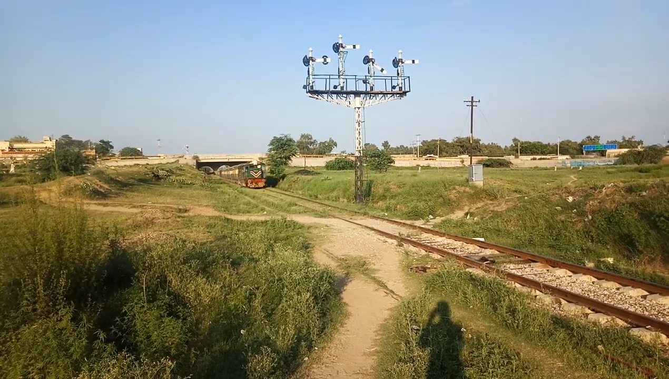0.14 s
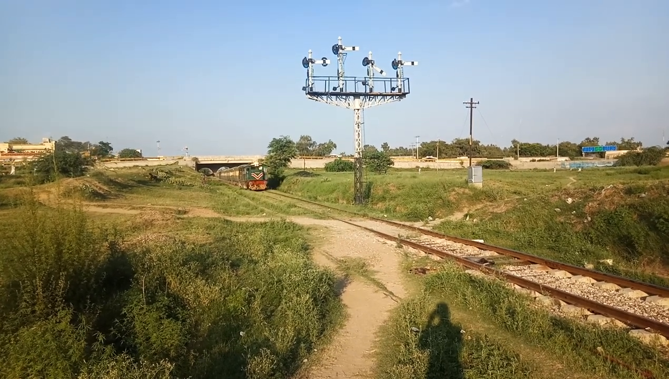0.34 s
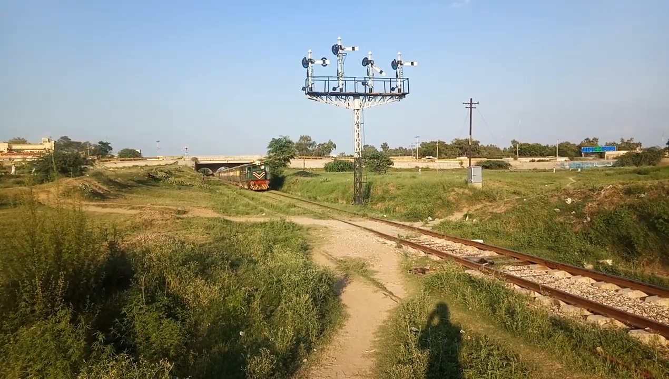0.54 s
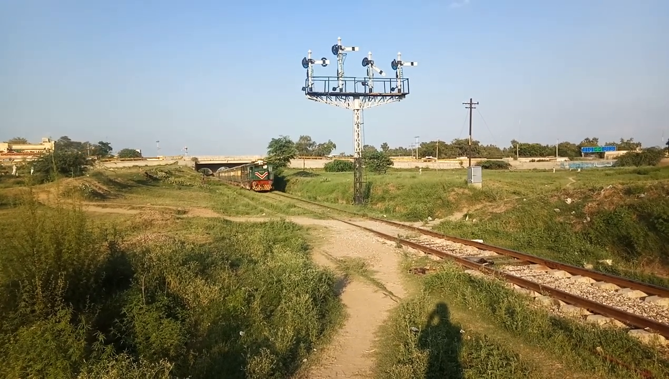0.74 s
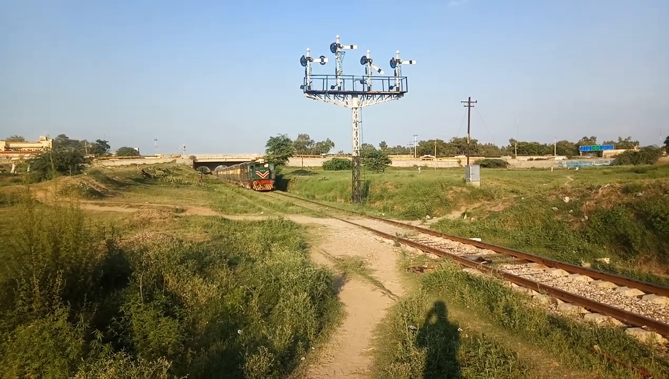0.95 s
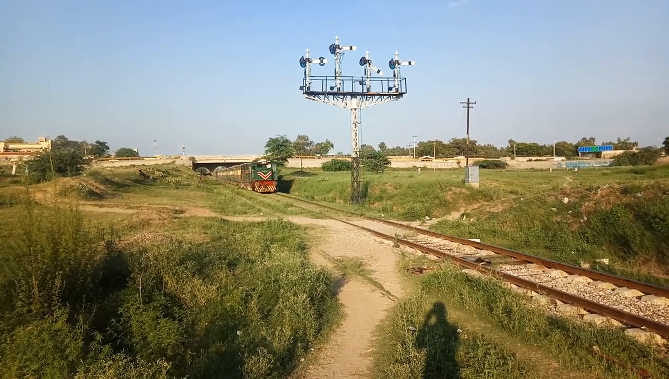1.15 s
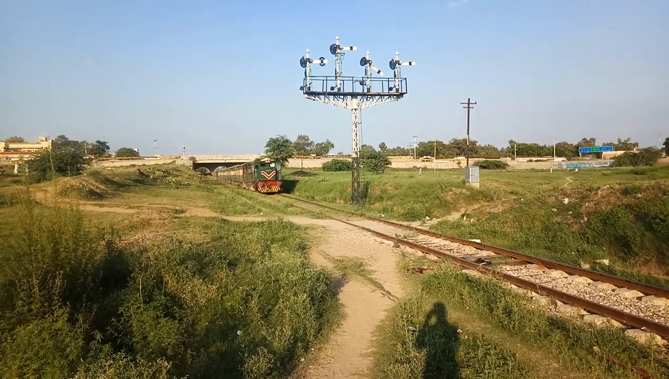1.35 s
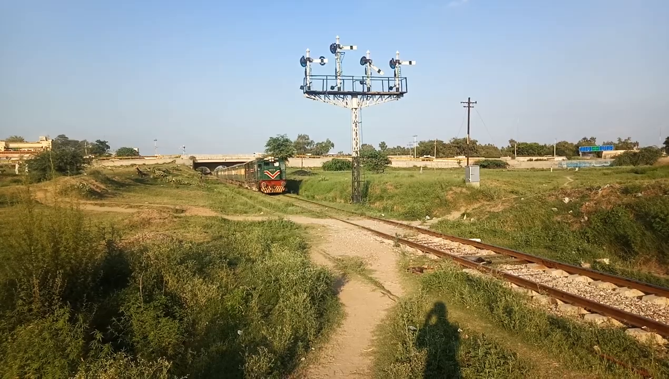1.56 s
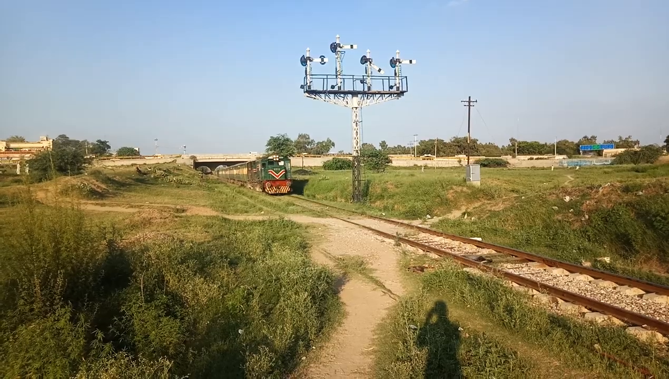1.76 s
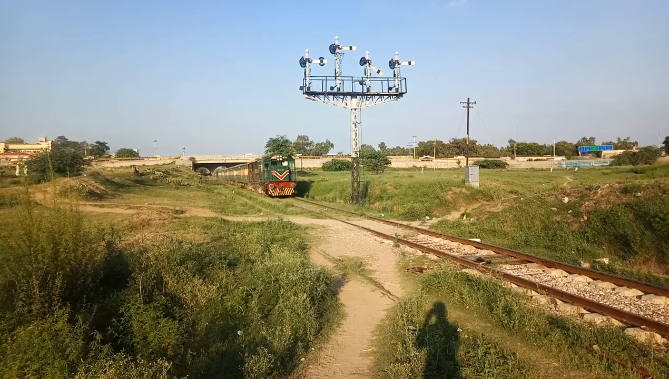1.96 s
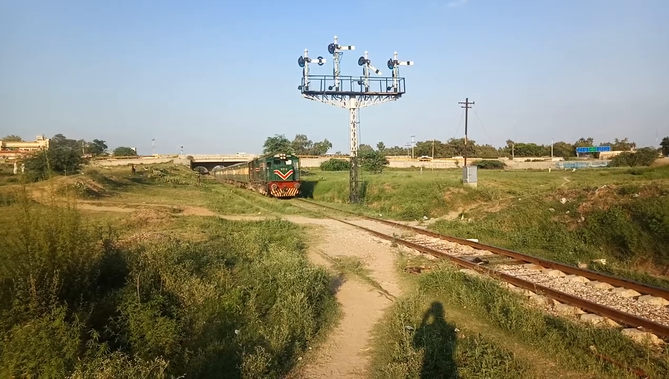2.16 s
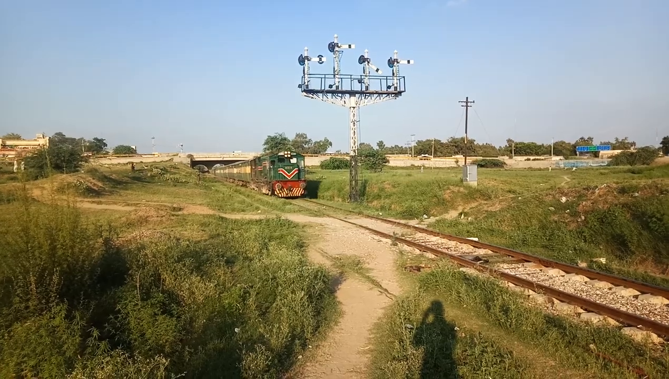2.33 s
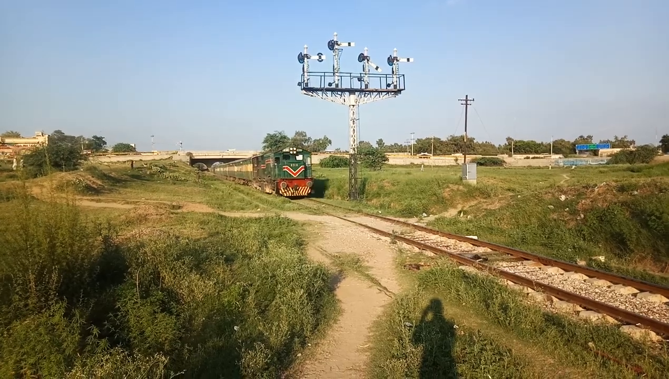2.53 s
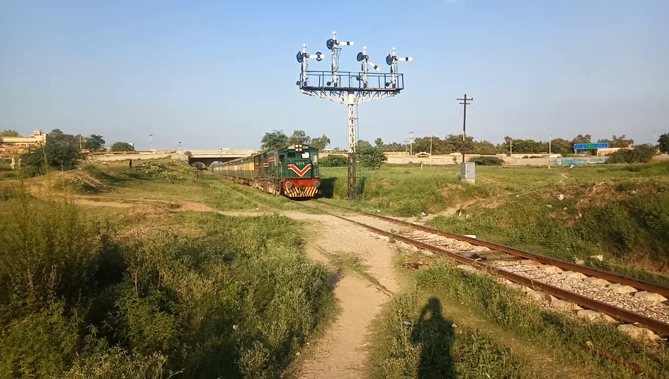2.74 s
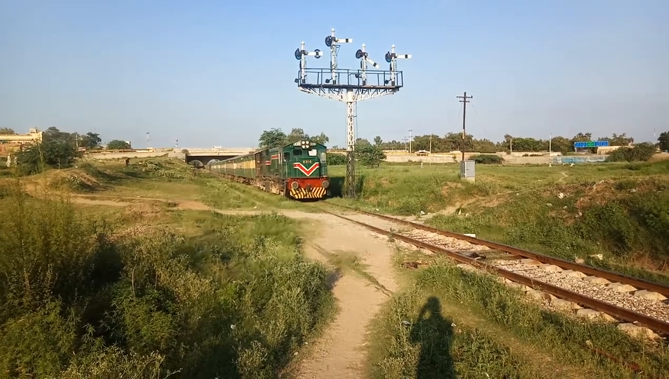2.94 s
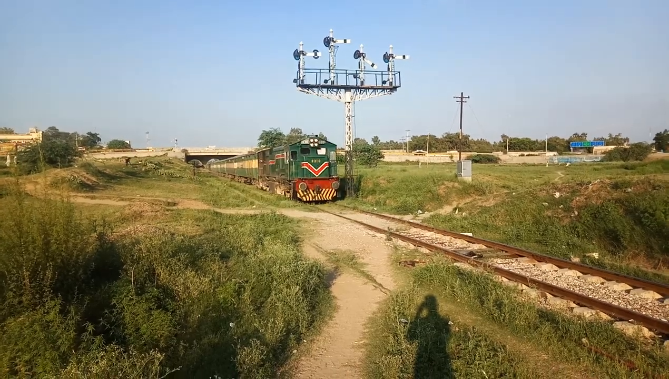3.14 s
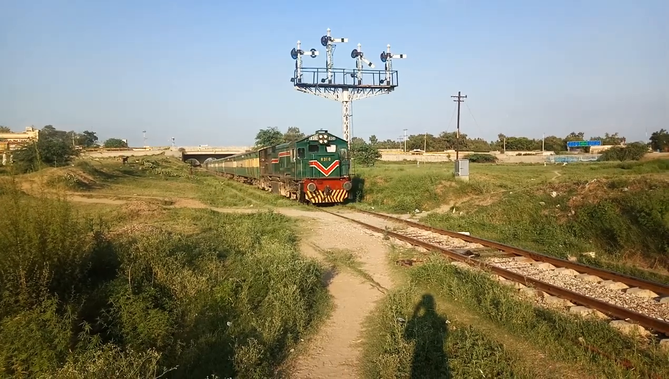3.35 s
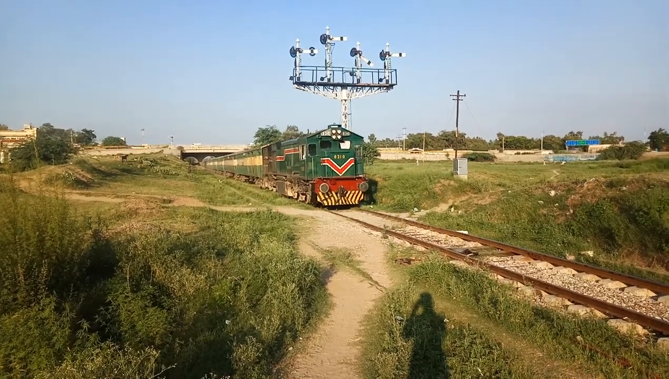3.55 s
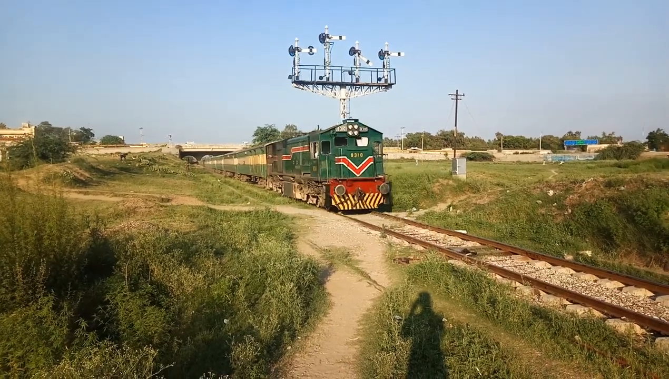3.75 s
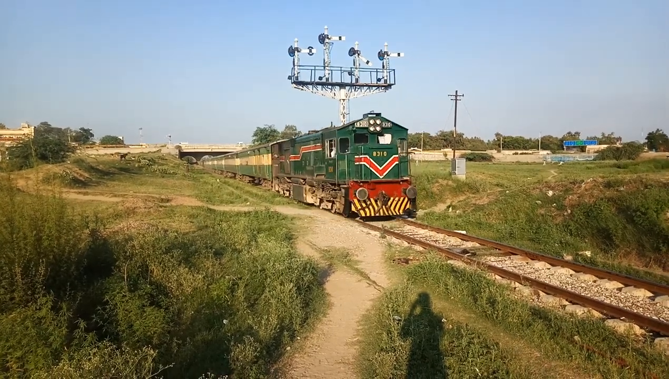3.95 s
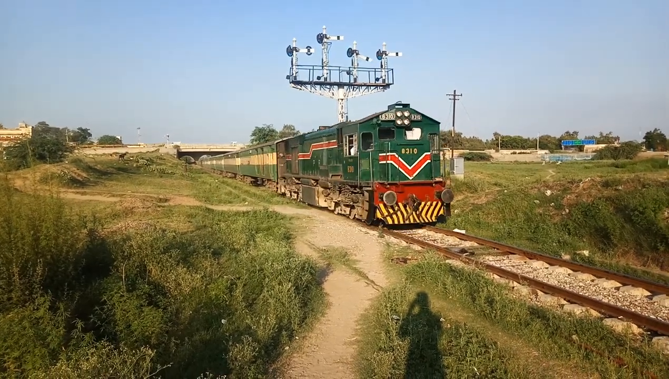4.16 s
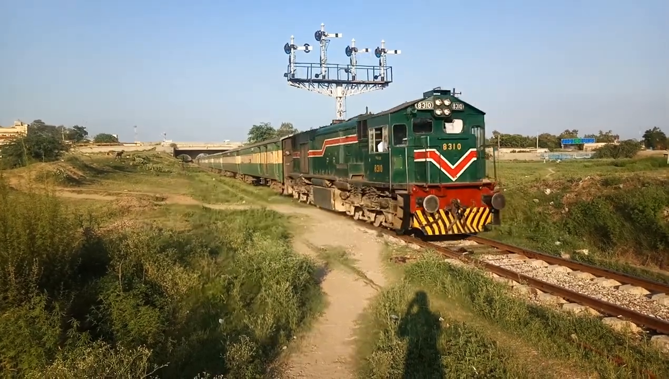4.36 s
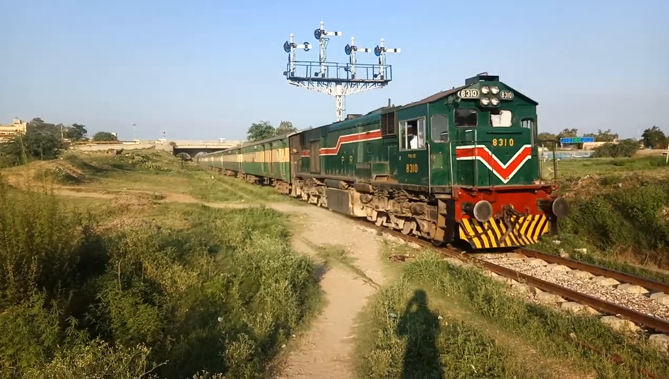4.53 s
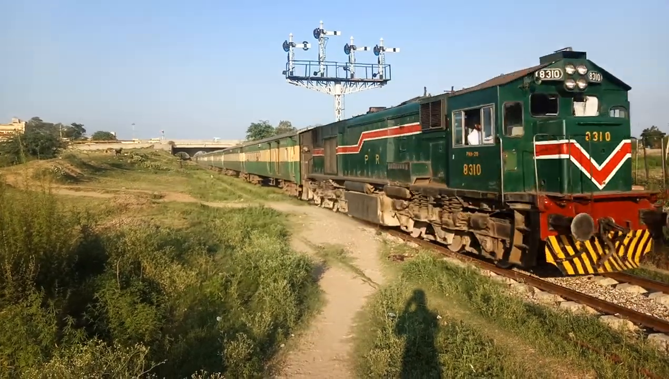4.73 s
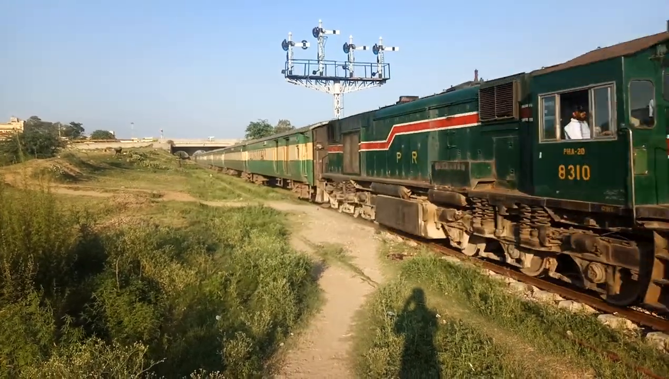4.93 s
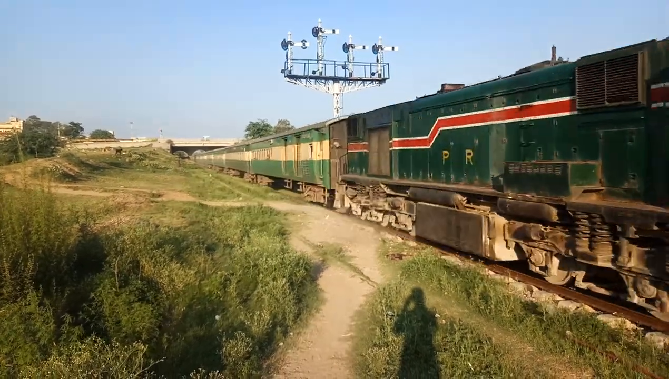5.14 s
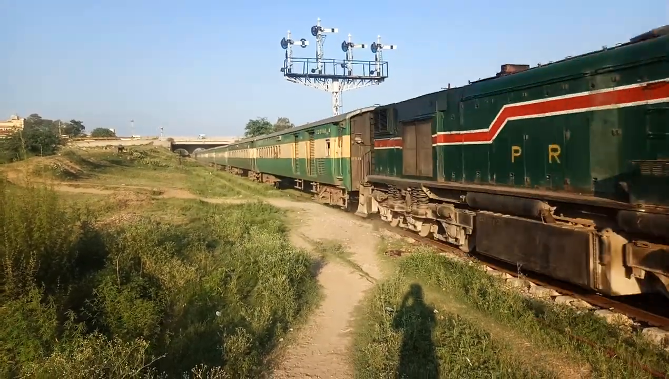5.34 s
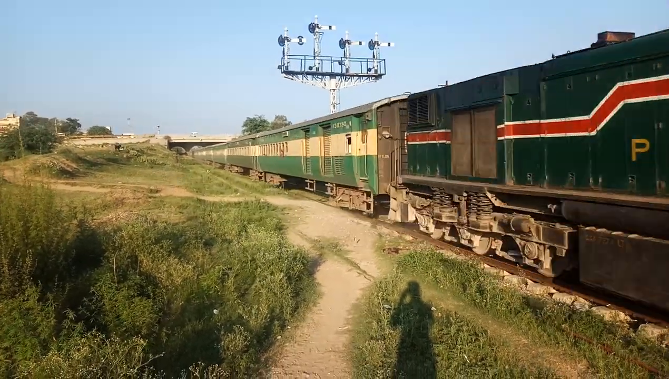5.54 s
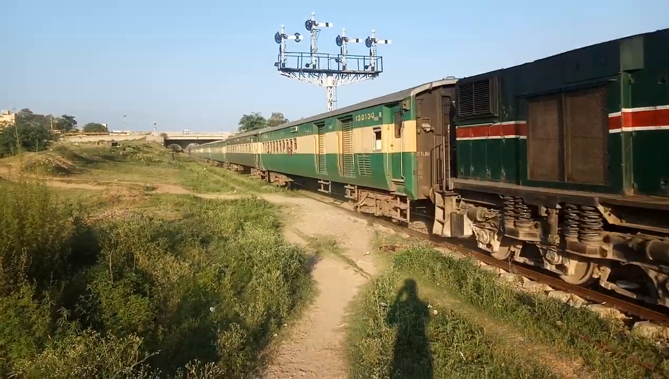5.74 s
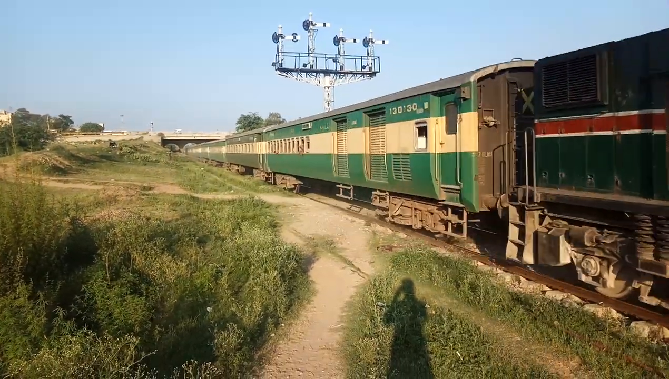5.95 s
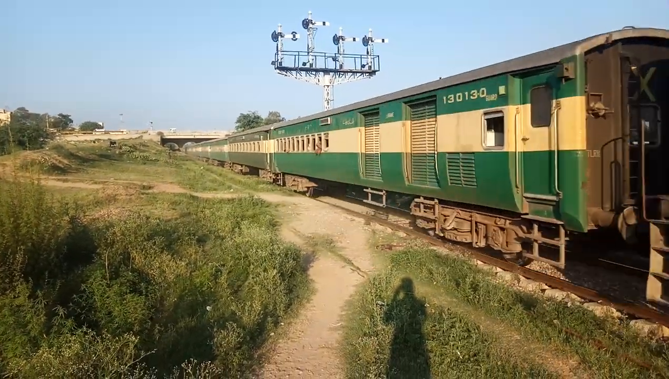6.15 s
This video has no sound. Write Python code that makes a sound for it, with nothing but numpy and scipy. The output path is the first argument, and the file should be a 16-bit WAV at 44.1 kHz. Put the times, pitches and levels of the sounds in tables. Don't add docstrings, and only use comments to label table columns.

```python
import sys
import numpy as np
from scipy import signal
from scipy.fft import rfft, irfft, next_fast_len
from scipy.io import wavfile
from scipy.ndimage import uniform_filter1d, minimum_filter1d, map_coordinates

SR = 44100
rng = np.random.default_rng(int(sys.argv[2]) if len(sys.argv) > 2 else 0)


def gain_from_decibels(decibels):
    exponent = np.asarray(decibels, float) / 20
    return 10 ** exponent


def materialize(psi):
    bounded = np.clip(np.atleast_2d(psi).T, -1, 1)
    quanta = np.round(bounded * 32767).astype(np.int16)
    wavfile.write(sys.argv[1], SR, quanta)


N = 272979

# time in seconds, loudness in dB, firing rate in Hz.
ENGINE = [(0, -41, 105.4), (.4, -36, 103), (.8, -35.5, 104.5), (1.2, -33, 101), (1.8, -29.5, 100),
          (2.5, -28.5, 100.9), (2.85, -23.5, 103.8), (3.1, -25.5, 100.4), (3.7, -22.5, 102),
          (3.9, -18, 99.2), (4.35, -18, 99.86), (4.5, -17, 104.8), (5.2, -18.5, 104.5),
          (5.33, -17.5, 99.43), (5.52, -16.5, 99.6), (5.8, -17, 102.9), (6.05, -16.5, 99),
          (6.19, -19.5, 101.4)]
# centre in seconds, change in dB, length in seconds.
SURGES = [(0.154, -3, .05), (1.592, 0, 0.096), (1.76, -6, 0.047), (2.118, 5, 0.033), (2.63, -0.5, 0.051),
          (2.767, -5.5, 0.042), (3.15, 2, 0.14), (3.568, 1.5, 0.031), (3.928, 4, .035), (4.018, 0.5, 0.019),
          (4.19, 7.5, 0.02), (4.32, 3.5, 0.033), (4.808, -7, 0.021), (5.299, -4, 0.055), (5.5, 5, 0.023),
          (5.73, 2.5, .04), (5.832, -7.5, 0.037), (5.908, 0, 0.023), (5.99, -1, 0.026), (6.158, 5, 0.017)]
# time in seconds, level in dB.
SECOND_ORDER_HEARD = [(0, -16.5), (3.7, -20), (4.3, 2), (5.4, 8), (5.6, -8), (6.19, -13)]
# time in seconds, loudness in dB, load on the nearest track in dB, flank in view 0-1.
RUNNING_GEAR = [(0, -50, -9, 0), (.3, -45, -9.5, 0.17), (.8, -43, -9.5, .2), (1.2, -43.5, -7.5, 0.25),
                (2, -38, -6.5, 0.37), (2.9, -33.5, -6, 0.43), (3.45, -31, 1, .5), (3.7, -27, 0.5, 0.6),
                (3.78, -25.5, 3.5, 0.63), (4.14, -20, -2, .67), (4.45, -20, -2.5, 0.88),
                (4.8, -22, -2.5, .86), (4.92, -18.5, -4, 0.99), (5.45, -20.5, -1, 0.96),
                (5.7, -22, 0.5, 0.91), (5.95, -22, -2, 0.87), (6.05, -15.5, 3, 1), (6.19, -23.5, 1, .95)]
# time in seconds, share of the flank in the wheel sound 0-1.
FLANK_BESIDE = [(0, 0), (5.2, 0.28), (5.35, 0.93), (6.19, 1)]
# time in seconds, strength 0-1.
GROUND_BOUNCE = [(0, 0.2), (3.5, 0.16), (4.2, 0.22), (5.15, 0.25), (5.35, 0), (6.19, 0)]
# time in seconds, peak in dB, thud in dB, snap in dB.
AXLE_BLOWS = [(0.248, -28, -4, -46), (0.39, -31.5, -1, -48), (1.102, -26.5, -0.5, -56),
              (1.973, -17, -8, -49), (2.798, -25.5, 2, -45), (2.8499, -18, -8, -49),
              (3.0844, -18, -13, -43), (3.7165, -24, 0, -53), (3.7502, -14.5, 5, -46.5),
              (3.884, -12, 2.5, -52), (4.165, -16.5, -10, -51.5), (4.291, -3, -2.5, -43),
              (4.430, -5, 3, -42), (4.5025, -4.5, -17, -52.5), (4.582, -2.5, -3, -45),
              (4.711, -2.5, -2, -43.5), (4.850, -3, -6.5, -42), (4.892, -8, -31, -44), (5, -3.5, -2, -42),
              (5.138, -6.5, -9, -43.5), (5.2637, -6.5, -3, -45.5), (5.322, -7.5, 6, -37.5),
              (5.4026, -5, 0, -46), (5.465, -4.5, -1.5, -40.5), (5.563, -9, 6.5, -41), (5.621, -5, 2, -41),
              (5.7028, -6, 0, -47), (6.030, -5.5, 4.5, -38.5), (6.067, -16, -14, -39),
              (6.133, -14.5, -15, -42.5)]
# start in seconds, end in seconds, change in dB.
UNLOADINGS = [
    (4.574, 4.582, -3.5),
    (4.823, 4.84, -3.5),
    (5.308, 5.32, -1.5),
    (5.457, 5.461, -2),
    (5.603, 5.613, 0.5),
    (6.014, 6.03, -6),
]
# time in seconds, peak in dB, pitch in Hz, t60 in seconds.
INSECT_TICKS = [
    (.6412, -46, 6900, .006),
    (1.279, -46, 7100, .006),
]
# time in seconds, peak in dB, pitch in Hz, t60 in seconds.
FLANGE_SQUEAKS = [
    (.03, -52, 2100, 0.15),
    (4.5, -57, 9000, .1),
    (5.185, -44, 9060, .05),
    (5.77, -61, 13200, 0.048),
    (5.955, -60, 9400, 0.16),
]

# frequency in Hz, level in dB per Hz.
DEEP_SPECTRUM = [(12, -44), (25, -38), (40, -11), (55, 0), (70, 11.5), (100, 7.5), (130, 9.5), (200, -65)]
BODY_SPECTRUM = [(50, -54), (85, -11.5), (125, -0.5), (170, 0), (210, -3.5), (260, -7.5), (350, -66)]
DRONE_SPECTRUM = [(120, -57.5), (180, -4), (215, -0.5), (265, 3.5), (315, 3), (400, -2.5), (450, -14),
                  (550, -62)]
# frequency in Hz, level in dB per Hz.
SLEEPER_SPECTRUM = [(250, -16.5), (380, -1), (520, 0), (650, 3), (900, -1), (1100, -11.5), (1500, -65)]
RAIL_SPECTRUM = [(650, -25), (950, -4.5), (1180, 1.5), (1450, -6), (1620, -6), (1900, -10.5), (2100, -6.5),
                 (2400, -24.5), (3000, -56)]
WHEEL_SPECTRUM = [(1180, -36), (2000, -0.5), (2170, -22.5), (2670, 7), (2950, -1.5), (3150, 4), (3720, 6.5),
                  (4150, -2), (4510, -5), (4900, -18.5), (5290, -17), (5530, -19.5), (6150, -33.5),
                  (7500, -39.5), (9750, -71.5), (16500, -120)]
FLANK_SPECTRUM = [(1060, -12), (1800, 6), (2110, 2.5), (2570, 4.5), (3750, 3.5), (4220, -5), (5510, -28),
                  (6040, -34), (7000, -29), (9100, -60), (15400, -120)]
# frequency in Hz, level in dB per Hz.
SCRAPE_SPECTRUM = [(2940, -45.5), (5000, 1.5), (5530, -1), (6040, -0.5), (7670, -19.5), (9190, -24.5),
                   (9600, -34), (12500, -59), (21100, -120)]
RIM_SPECTRUM = [(5500, -37.5), (5850, -2.5), (6080, -7.5), (6350, -2), (6900, -35.5)]
# frequency in Hz, level in dB per Hz.
FAR_AIR_SPECTRUM = [(7000, -24), (8800, 1.5), (10300, 2.5), (11400, -0.5), (13000, -7.5), (15480, -9)]
NEAR_AIR_SPECTRUM = [(7000, -26), (9000, -2.5), (9700, -4), (10400, -3), (11400, 1), (12500, -2),
                     (14200, 0.5), (15480, 3)]

FULL_DB = -15
# (level at full loudness dB, dB gained per dB of loudness)
DEEP_LAW, BODY_LAW, DRONE_LAW = (-30.5, 0.62), (-22, 0.78), (-18.5, 1.225)
SECOND_LAW, THIRD_LAW = (-25.5, 1.6), (-19.5, 1.22)
DEEP_BEHIND_DB, BODY_BEHIND_DB, DRONE_BESIDE_DB = -3.5, -1, 1.5
RAIL_DB, RAIL_FOLLOWS_LOAD = -7, 0.2
SCRAPE_DB, AIR_DB = (-81, -39.5), (-92.5, -60)
RIM_DB = -10
BLOW_RISE_S, BLOW_T60_S = 0.0016, 0.13
FLANK_ARRIVES_S = FLANK_BESIDE[1][0]
FAR_SMEAR = 0.68
RAIL_LEAD_S = 0.007
BOUNCE_S = 0.001781
HISS_DB = -85.5


def unit(x):
    return x / np.sqrt(np.mean(x ** 2) + 1e-20)


def along(points, hz):
    f, v = np.transpose(points)
    return gain_from_decibels(np.interp(np.log(hz + 1), np.log(f + 1), v, right=-140))


def curves(rows):
    s, *cols = np.transpose(rows)
    return [np.interp(np.arange(N) / SR, s, c) for c in cols]


def wobble(rate_hz):
    knots = rng.standard_normal(int(N * rate_hz / SR) + 4)
    return map_coordinates(knots, [np.arange(N) * rate_hz / SR])


def shaped(x, spectrum):
    m = next_fast_len(N + SR // 2)
    gain = along(spectrum, np.fft.rfftfreq(m, 1 / SR))
    return unit(irfft(rfft(x, m) * gain, m)[:N])


def rush(spectrum, patchy_db=0, grit_db=0):
    z = signal.stft(rng.standard_normal(N), nperseg=512)[2]
    field = uniform_filter1d(rng.standard_normal(z.shape), size=5, axis=0)
    field = uniform_filter1d(field, size=10, axis=1)
    noise = signal.istft(z * gain_from_decibels(patchy_db * unit(field)), nperseg=512)[1][:N]
    return shaped(noise * gain_from_decibels(grit_db * wobble(180)), spectrum)


def surging_db():
    t = np.arange(N) / SR
    return sum(db * np.exp(-((t - s) / length_s) ** 2) for s, db, length_s in SURGES)


def firing_order(hz, db, smear_hz, flutter_db):
    tremble_db = flutter_db * (wobble(25) + 0.3 * wobble(8))
    phase = 2 * np.pi * np.cumsum(hz + smear_hz * wobble(70)) / SR
    return unit(gain_from_decibels(tremble_db)) * gain_from_decibels(db + 2.5) * np.sin(phase)


def exhaust():
    loud_db, firing_hz = curves(ENGINE)
    loud_db = loud_db + surging_db()
    firings = np.cumsum(firing_hz * (1 + 0.03 * wobble(12))) / SR
    puffs = unit(np.diff(np.floor(firings), prepend=0) * gain_from_decibels(6 * rng.standard_normal(N)))
    beside = curves(FLANK_BESIDE)[0]

    def law_db(full_db, gain):
        return full_db + gain * (loud_db - FULL_DB)

    def gas(puff_share, spectrum):
        return shaped(puff_share * puffs + rng.standard_normal(N), spectrum)

    deep_db = law_db(*DEEP_LAW) + DEEP_BEHIND_DB * beside + 1.9 * wobble(8)
    body_db = law_db(*BODY_LAW) + BODY_BEHIND_DB * beside + 2.65 * wobble(9.9)
    drone_db = law_db(*DRONE_LAW) + DRONE_BESIDE_DB * beside + 1.14 * wobble(7.2)
    deep = gain_from_decibels(deep_db) * gas(0.19, DEEP_SPECTRUM)
    body = gain_from_decibels(body_db) * gas(0.47, BODY_SPECTRUM)
    drone = gain_from_decibels(drone_db) * gas(0.17, DRONE_SPECTRUM)
    second_db = law_db(*SECOND_LAW) + curves(SECOND_ORDER_HEARD)[0]
    second = firing_order(2 * firing_hz, second_db, smear_hz=10.1, flutter_db=3.5)
    third = firing_order(3 * firing_hz, law_db(*THIRD_LAW), smear_hz=9, flutter_db=3)
    return deep + body + drone + second + third


def running_levels_db():
    loud_db, load_db, view = curves(RUNNING_GEAR)

    def seen_db(hidden_db, full_db):
        return hidden_db + (full_db - hidden_db) * view

    return loud_db, load_db, seen_db(*SCRAPE_DB), seen_db(*AIR_DB)


def wheels(**texture):
    share = np.clip(curves(FLANK_BESIDE)[0], 0, 1)
    ahead = np.sqrt(1 - share) * rush(WHEEL_SPECTRUM, **texture)
    return ahead + np.sqrt(share) * rush(FLANK_SPECTRUM, **texture)


def cooling_air(**texture):
    near = np.clip(curves(FLANK_BESIDE)[0] + 0.15, 0, 1)
    far_air = np.sqrt(1 - near) * rush(FAR_AIR_SPECTRUM, **texture)
    return far_air + np.sqrt(near) * rush(NEAR_AIR_SPECTRUM, **texture)


def unloading():
    db = np.zeros(N)
    for start_s, end_s, dip_db in UNLOADINGS:
        db[round(start_s * SR):round(end_s * SR)] = dip_db
    return gain_from_decibels(uniform_filter1d(db, size=100))


def rolling():
    wheel_db, load_db, scrape_db, air_db = running_levels_db()
    sway = wobble(7) + 0.63 * wobble(22)
    rail_db = wheel_db + RAIL_DB + RAIL_FOLLOWS_LOAD * load_db
    sleeper = gain_from_decibels(wheel_db + load_db + 0.45 * sway) * rush(SLEEPER_SPECTRUM, patchy_db=1.97, grit_db=0.75)
    rail = gain_from_decibels(rail_db + 0.58 * sway) * rush(RAIL_SPECTRUM, patchy_db=2.0, grit_db=0.8)
    wheel = gain_from_decibels(wheel_db + 0.66 * sway) * wheels(patchy_db=1.5, grit_db=0.82)
    scrape = gain_from_decibels(scrape_db + 1.2 * sway) * rush(SCRAPE_SPECTRUM, patchy_db=1.5, grit_db=1.1)
    air = gain_from_decibels(air_db + 0.8 * sway) * cooling_air(patchy_db=2.2, grit_db=1)
    rim = gain_from_decibels(scrape_db + RIM_DB + 1.5 * sway) * rush(RIM_SPECTRUM)
    dips = unloading()
    return dips * (sleeper + rail + wheel), dips * (scrape + air + rim)


def pings(events, attack_s, waver):
    t, out = np.arange(SR // 4) / SR, np.zeros(N + SR)
    bent_s = np.cumsum(1 + waver * wobble(150)[:len(t)]) / SR
    for s, db, hz, t60_s in events:
        envelope = gain_from_decibels(db + 8.5 - 60 * t / t60_s) * (1 - np.exp(-t / attack_s))
        out[round(s * SR):][:len(t)] += envelope * np.sin(2 * np.pi * hz * bent_s)
    return out[:N]


def joints():
    t = np.arange(SR // 2) / SR
    clack, thud, snap, tick = np.zeros((4, N + SR))

    def strike(envelope, s, db, rise, decay):
        blow = (1 - np.exp(-t / (rise * BLOW_RISE_S))) * gain_from_decibels(-60 * t / (decay * BLOW_T60_S))
        envelope[round(s * SR):][:len(t)] += gain_from_decibels(db) * blow

    for s, db, thud_db, snap_db in AXLE_BLOWS:
        oncoming = s < FLANK_ARRIVES_S
        smear = FAR_SMEAR * oncoming
        strike(clack, s, db, 0.45 + 0.2 * smear, 1.0)
        strike(thud, s, db + thud_db, 4.6, 1.42)
        strike(snap, s, db + 1.574 * snap_db + 19.5, 0.44 + 0.4 * smear, 0.77)
        strike(tick, s - RAIL_LEAD_S * oncoming, db + 1.9 * snap_db + 23, 0.35 + 0.6 * smear, 0.6)
    nearness = gain_from_decibels(running_levels_db()[3] - AIR_DB[1])
    track = rush(SLEEPER_SPECTRUM) + 0.81 * rush(RAIL_SPECTRUM)
    top = 0.15 * np.sqrt(nearness) * rush(NEAR_AIR_SPECTRUM)
    steel = snap[:N] * rush(SCRAPE_SPECTRUM) + tick[:N] * top
    return gain_from_decibels(-9.5) * clack[:N] * wheels() + gain_from_decibels(-10) * thud[:N] * track, gain_from_decibels(21.5) * steel


def bounced(x):
    dull = signal.lfilter(*signal.butter(2, 3200, fs=SR), x)
    dull = dull + 0.72 * signal.filtfilt(*signal.butter(2, 800, fs=SR), dull)
    late = np.pad(dull, (round(BOUNCE_S * SR), 0))[:N]
    return x - curves(GROUND_BOUNCE)[0] * late


def scene():
    roar, scrape = rolling()
    clacks, snaps = joints()
    insect = pings(INSECT_TICKS, attack_s=0.0012, waver=0.03)
    flanges = pings(FLANGE_SQUEAKS, attack_s=0.008, waver=0.006)
    mix = exhaust() + gain_from_decibels(-0.24) * bounced(roar + clacks) + scrape + snaps + insect + flanges
    return mix[None]


def top_cut(x):
    return signal.sosfilt(signal.butter(12, 16020, fs=SR, output="sos"), x)


def record(dry):
    x = dry + gain_from_decibels(HISS_DB + 6.5) * rng.standard_normal(dry.shape)
    needed = np.minimum(1, 0.88 / (np.abs(x) + 1e-9))
    held = uniform_filter1d(minimum_filter1d(needed, size=441, axis=1), size=221, axis=1)
    x = x * np.minimum(1, np.arange(N)[::-1] / 80) * held
    m = next_fast_len(N + SR // 2)
    hz = np.fft.rfftfreq(m, 1 / SR)
    port_hz, width_hz, depth, top_hz = 5490, 250, 0.42, 15480
    port = (1 - depth * np.exp(-((hz - port_hz) / width_hz) ** 2)) * (hz < top_hz)
    padded = np.pad(x, ((0, 0), (0, m - N)), "reflect") * np.minimum(1, np.arange(m)[::-1] / (m - N))
    mix = irfft(rfft(padded) * port, m)[:, :N]
    return top_cut(mix)


dry = scene()
out = record(dry)
materialize(out)
```